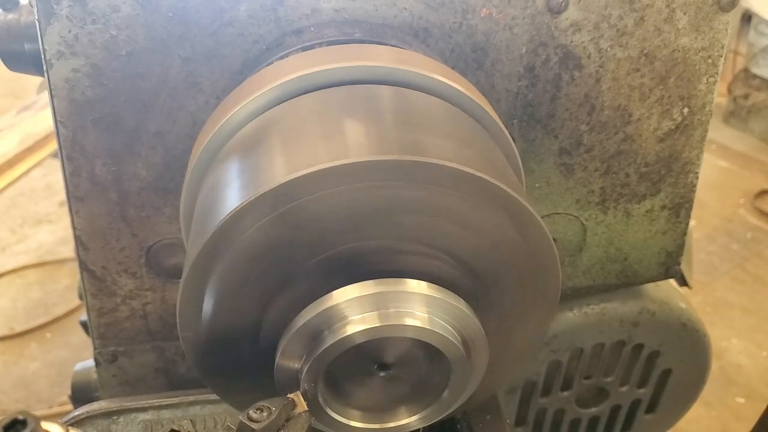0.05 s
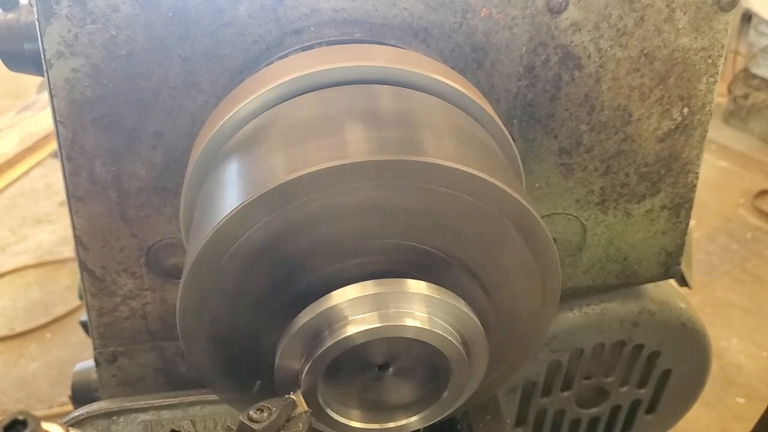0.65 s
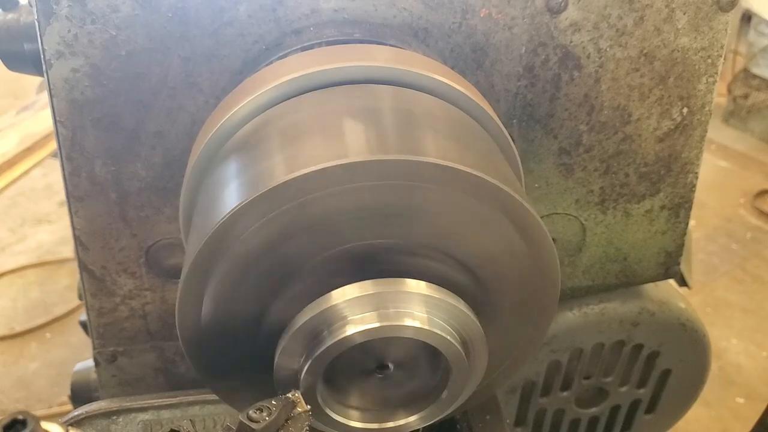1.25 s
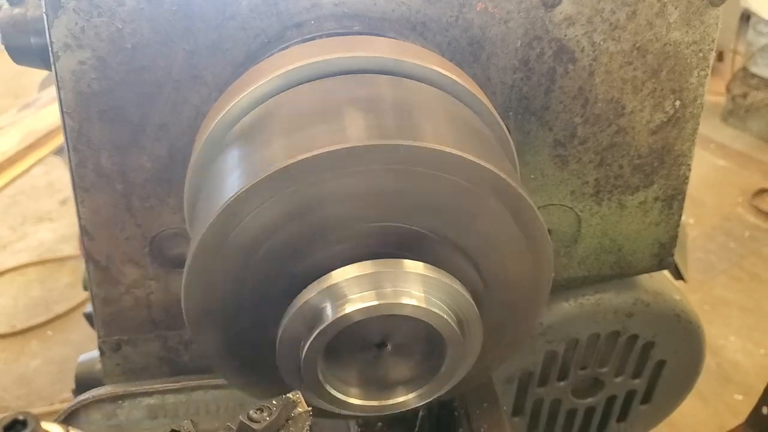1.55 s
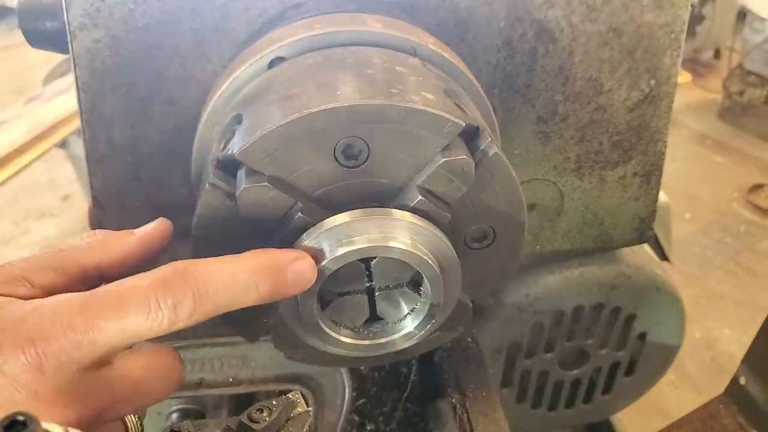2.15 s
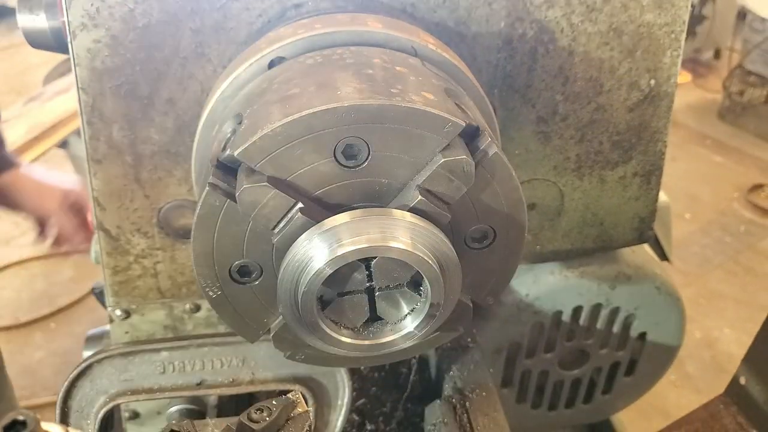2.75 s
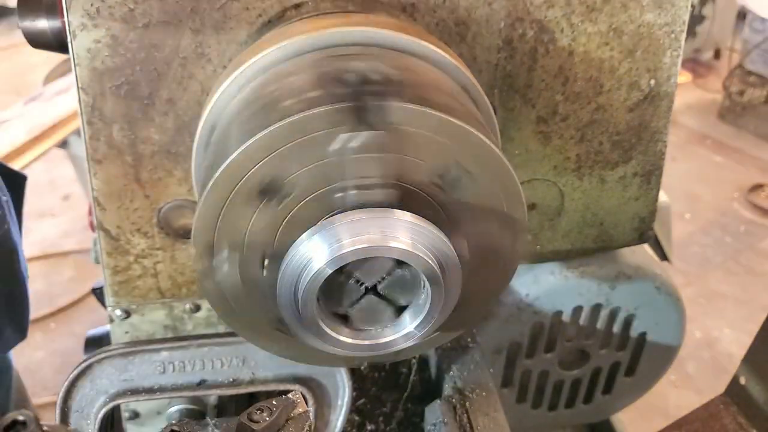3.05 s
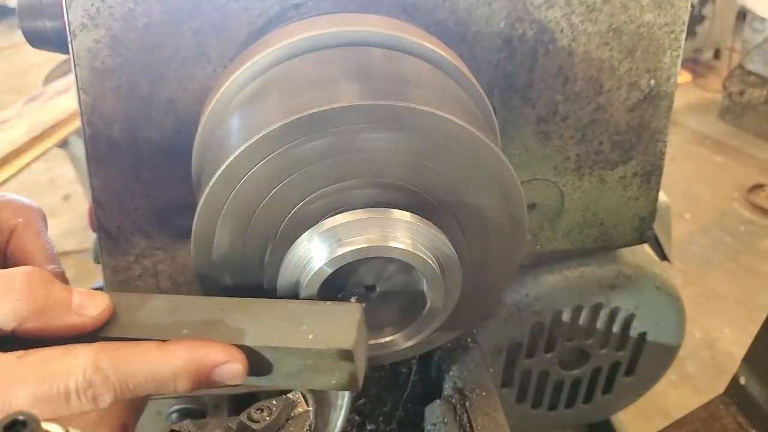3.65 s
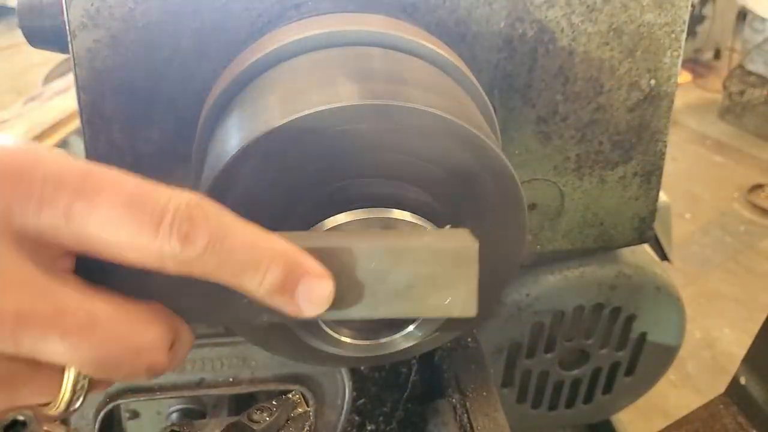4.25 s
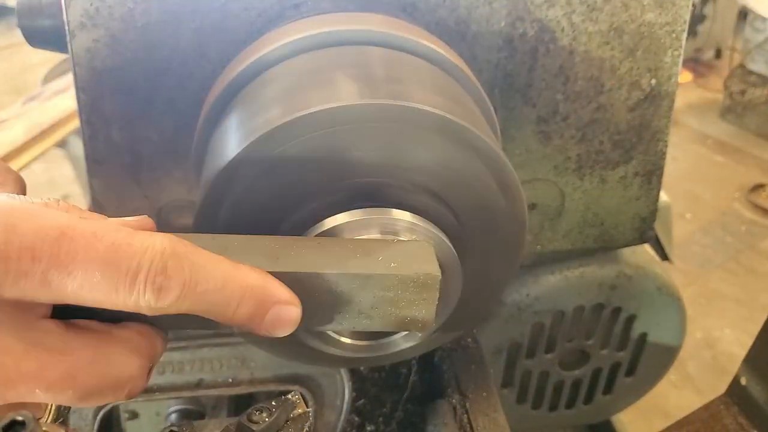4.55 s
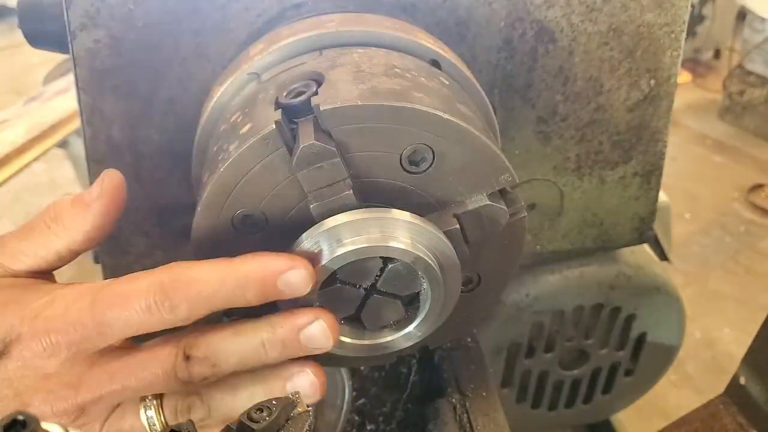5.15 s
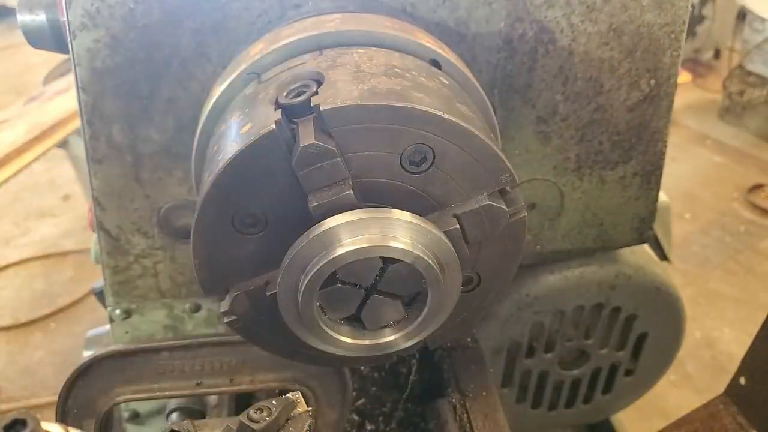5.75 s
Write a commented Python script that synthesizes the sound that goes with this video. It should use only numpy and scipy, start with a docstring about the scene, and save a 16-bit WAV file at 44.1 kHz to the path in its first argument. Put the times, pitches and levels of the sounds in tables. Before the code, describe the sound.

Close up in a workshop, a metal lathe runs with whining, rattling gears while a tool scrapes steel. It brakes with a few knocks, a thin high whistle lingers, and a finger squeaks on the part. The lathe spins up again with a rising whine and a hand-held file scrapes for about a second. It brakes once more, the whistle returns and a palm softly pats the part over a faint hum.

```python
"""A metal lathe in a workshop, heard close up on a stereo pair of microphones.
It is already running: gears whine and rattle in the cast headstock while a tool scrapes the steel part.
Near 1.9 s it brakes, teeth knocking; the motor whistles as it holds the chuck, and a finger squeaks on
the part. At 2.9 s it spins up again and a hand-held file scrapes. Near 5 s it brakes once more, the
whistle returns and a palm pats the part. A faint hum stays in the room throughout."""
import sys
import numpy as np
from scipy import signal
from scipy.io import wavfile
from scipy.ndimage import uniform_filter1d

SR = 44100
rng = np.random.default_rng(int(sys.argv[2]) if len(sys.argv) > 2 else 0)


def to_wav(sig):
    """Store sig (one row per channel, or 1-D mono) as 16-bit WAV at the path in sys.argv[1].

    Samples outside -1..1 are clipped; the rate is SR.
    """
    pcm = np.clip(np.atleast_2d(sig), -1, 1) * 32767
    pcm = np.round(pcm).astype(np.int16)
    wavfile.write(sys.argv[1], SR, pcm.T)  # frames by channels


N = 260189
TIME = np.arange(N) / SR
COARSE_TIME = np.arange(0, N + 64, 64) / SR
BINS = np.fft.rfftfreq(N, 1 / SR)

MESH_HZ, SHAFT_HZ = 86.64, 30.2  # at full speed
RUN_UP_S, BRAKE_S = 0.59, 0.225
TAKE_UP, DIE_AWAY = 0.072, 0.33  # shares of full speed: teeth take up their slack; braking sound fades
WHISTLE_HZ = 8015

# Table levels are relative, ahead of each source's gain; the drive's tones are given at full speed.
# runs of the spindle (switch on [s], brake [s], growl [dB], rattle [dB], hiss [dB])
RUNS = [(-1, 1.865, -48, -41, -46), (2.92, 4.972, -52, -42, -45.5)]
# drop of growl, rattle and hiss towards rest (pulling [dB], braking [dB], exponent)
SLOWING = [(4, 11.5, 1.17), (10, 19.5, 1.63), (14, 26.5, 1.45)]
# broad response of the headstock (frequency [Hz], level [dB])
HEADSTOCK = [(100, -26), (380, -21), (560, -8.5), (1000, -6.5), (1900, -3.5), (3000, 0), (3950, -5.5),
             (4300, -15), (4800, -12.5), (5400, -7.5), (9000, -13.5), (12000, -15.5), (13200, -28.5),
             (15500, -38.5)]
# resonances of its casting (frequency [Hz], width [Hz], lift [dB])
CASTING_MODES = [(1443, 91, 4.3), (1930, 78, 1.2), (2155, 22, 11), (2358, 160, 9), (3240, 480, 3.9),
                 (7825, 620, 5.9), (10510, 530, 7)]
# low tones of the loaded drive, one list a run (frequency [Hz], level [dB])
GROWL_TONES = [
    [(549.1, -58.5), (732.1, -77), (915.2, -64), (1211, -66), (1384, -77), (1717, -65), (1809, -58.5)],
    [(549.1, -64), (597.5, -67), (732.1, -71), (1098, -66), (1211, -65.5), (1389, -63.5), (1723, -72),
     (1814, -61.5)],
]
# motor overtones that swell in the first run (frequency [Hz], level [dB])
DRONE_TONES = [(274.6, -76), (823.6, -56), (1470, -61), (1561, -61.5), (1744, -54)]
# gear whine (frequency [Hz], level [dB])
GEAR_TONES = [(2164, -59.5), (2250, -54.5), (2342, -56.5), (2428, -50), (2514, -57), (2600, -56),
              (2686, -63.5), (2859, -57), (2977, -58.5), (3117, -56), (3295, -73), (3381, -58), (3467, -50),
              (3553, -60.5), (3639, -71), (3811, -63.5), (3898, -56.5), (4075, -83)]
# bearing whine (frequency [Hz], level [dB])
BEARING_TONES = [(5200, -71), (5959, -61), (6062, -62), (6325, -59), (6498, -66), (6848, -59),
                 (6934, -57.5), (7542, -63), (7607, -55), (7897, -66.5), (8145, -68.5), (10314, -65),
                 (10605, -75.5), (10745, -73)]
# sidebands of the drive's switching tone (frequency [Hz], level [dB])
SIDEBANDS = [(11250, -61.5), (12450, -67), (13650, -72), (14850, -63)]
# tool, then file (start [s], end [s], trend [dB/s], landing bite [dB], scrape [dB], shake [dB],
# growl [dB])
CUTS = [(-0.1, 1.28, 10.5, 2.5, -63, -69.5, -69), (3.46, 4.62, -10, 9, -56, -78, -48)]
# spectrum of tearing steel (frequency [Hz], level [dB])
GRIT = [(400, -25), (1200, 14.5), (3000, 2), (4500, -4.5), (6000, 6), (9000, 6.5), (10500, -13.5),
        (12500, 0.5), (14000, -26)]
# rumble spectrum of the machine bed (frequency [Hz], level [dB])
BED = [(20, -8), (45, -17.5), (80, -0.5), (160, -3.5), (300, -1.5), (500, -3.5), (900, -17.5)]
# hum tones in the room (frequency [Hz], level [dB])
HUM_TONES = [(458.5, -74), (920.5, -75.5), (1061, -95.5), (1378, -79), (4900, -99)]
# spectrum of the room's air (frequency [Hz], level [dB])
ROOM_AIR = [(24, -49), (60, -33), (250, -27.5), (350, -20.5), (440, -7), (560, -7), (950, -7.5),
            (1400, -13), (1700, -18), (3500, -24.5), (5500, -31), (8000, -30), (12500, -52.5), (15000, -77)]
# tooth tones under torque (frequency [Hz], level [dB])
TORQUE_TONES = [(2426, -53), (2860, -48), (3381, -50), (3466, -49), (3899, -53), (6931, -53)]
# teeth knocking across their backlash (time [s], level [dB])
KNOCKS = [(1.896, -34.5), (1.923, -43), (2.0205, -38), (2.035, -45.5), (2.068, -45), (2.9203, -55),
          (2.9383, -49), (2.9625, -45), (3.054, -46), (3.1, -43), (5.012, -45), (5.112, -44), (5.1171, -38),
          (5.1525, -45)]
# hiss spectrum of the holding motor (frequency [Hz], level [dB])
HOLD_HISS = [(900, -16), (2000, -7.5), (3800, -7.5), (4500, -12), (5400, -0.5), (6800, -10.5), (8000, -9),
             (8700, -6), (9300, -10), (12000, -16.5), (13500, -37)]
# dull bumps with a tick on top (time [s], thud [dB], tick [dB])
BUMPS = [(2.017, -82, -52), (2.775, -72, -64), (2.807, -83, -61), (2.838, -57.5, -68), (2.854, -71, -62),
         (3.075, -58, -37), (3.133, -53, -48), (3.144, -46.5, -35), (5.629, -77, -61), (5.728, -75, -69),
         (5.754, -69, -60)]
# spectrum of a thud (frequency [Hz], level [dB])
THUD = [(30, -32), (90, -22), (180, -5.5), (350, -1), (800, -26), (2000, -12), (8000, -23)]
# fingertip slips (start [s], length [s], first pitch [Hz], last pitch [Hz], level [dB])
SLIPS = [(2.316, 0.04, 1134, 875, -33.5), (2.3557, 0.024, 975, 935, -35.5)]
# partials of the squeak (multiple of the pitch, level [dB])
SQUEAK_PARTIALS = [(1, -1.5), (2, -19), (3, -17), (4, -23), (5, -23.5), (6, -28), (7, -30)]
# spectrum of skin rubbing steel (frequency [Hz], level [dB])
SKIN = [(180, -100), (300, -8), (620, 4), (940, 8), (1030, 10), (1240, 0.5), (2230, 9), (4680, -6.5),
        (8290, -12), (12000, -26), (15600, -56), (22000, -120)]
# stereo width at the microphones (frequency [Hz], side minus mid [dB])
WIDTH = [(60, 1), (200, 3), (380, -7.5), (700, -8), (1300, -9), (2400, -7.5), (4400, -7), (8000, -5),
         (13000, 4)]
# balance of the microphones (frequency [Hz], left minus right [dB])
LEAN = [(60, 2.5), (200, 3), (700, 1), (1300, -0.5), (2400, 0), (4400, 2), (8000, 2.5), (14000, 2)]


def amp(db):
    """Decibels to gain."""
    return 10 ** (np.asarray(db) / 20)


def unit(x):
    """Scales to rms 1."""
    return x / np.sqrt(np.mean(x ** 2) + 1e-20)


def spectrum(points):
    """A table of (frequency [Hz], level [dB]) on BINS, interpolated in log frequency."""
    hz, db = np.transpose(points)
    return np.interp(np.log(BINS + 1), np.log(hz + 1), db)


def colour(x, db):
    """Causal filter with the gain db, given on BINS."""
    size = 4096
    log_gain = np.log(amp(np.interp(abs(np.fft.fftfreq(size, 1 / SR)), BINS, db)))
    response = np.fft.ifft(np.exp(np.conj(signal.hilbert(log_gain)))).real
    return signal.oaconvolve(x, response[:size // 2])[:N]


def noise(points):
    """Noise of rms 1 with a given spectrum."""
    return unit(colour(rng.standard_normal(N), spectrum(points)))


def drift(per_s, t=TIME):
    """Random wander of rms 1."""
    knots = rng.standard_normal(8192)
    return unit(np.interp(t * per_s, np.arange(len(knots)), knots))


def grains(per_s, spread_db):
    """Random tiny impacts, a few of them large."""
    sizes = amp(spread_db * np.minimum(rng.exponential(1, N), 4)) * rng.choice([-1, 1], N)
    return unit(sizes * (rng.random(N) < per_s / SR))


def turning(hz):
    """Phase of something that turns at hz, from a random start."""
    return 2 * np.pi * (np.cumsum(hz * np.ones(N)) / SR + rng.random())


def ramp(start, length):
    """Rises from 0 to 1 in a straight line."""
    return np.clip((TIME - start) / length, 0, 1)


def envelope(start, end, rise_s, fade_db_per_s):
    """Attack, hold, release."""
    return ramp(start, rise_s) * amp(-fade_db_per_s * np.maximum(TIME - end, 0))


def burst(start, t60):
    """Envelope of a blow."""
    out = np.zeros(N)
    part = out[round(start * SR):][:SR // 4]
    part += amp(-60 * TIME[:len(part)] / t60)
    return out


def spindle(on, brake):
    """Share of full speed in one run: an even climb, a steady spell, a quick even stop."""
    return ramp(on, RUN_UP_S) * (1 - ramp(brake, BRAKE_S))


def drive_gains(speed, pull):
    """Growl, rattle and hiss follow the speed, and stay higher while the motor pulls."""
    meshed = sum(amp(levels_db)[:, None] * uniform_filter1d((spindle(on, brake) > TAKE_UP) * 1., 200)
                 for on, brake, *levels_db in RUNS)
    alive = np.clip(speed / DIE_AWAY + pull, 0, 1)
    slow = np.clip(1 - speed, 0, 1)
    slowing_db = [-(pull * pull_db + (1 - pull) * brake_db) * slow ** bend
                  for pull_db, brake_db, bend in SLOWING]
    return abs(meshed) * alive * amp(slowing_db)


def headstock():
    """Response of the casting in dB on BINS."""
    modes_db = sum(db / (1 + (2 * (BINS - hz) / width) ** 2) for hz, width, db in CASTING_MODES)
    return spectrum(HEADSTOCK) + modes_db


def whine(speed, tones, gain, tone_db, waver_db, speed_power):
    """Tones glide and grow with the speed, and swell as they cross the resonances of the casting."""
    body, out = headstock(), np.zeros(N)
    pace, travel = np.interp(COARSE_TIME, TIME, speed), np.cumsum(speed) / SR
    for hz, db in tones:
        harmonic = np.round(hz / MESH_HZ) * MESH_HZ
        hz = harmonic if abs(hz - harmonic) < 7 else hz
        lift_db = np.interp(hz * pace, BINS, body) - np.interp(hz, BINS, body)
        size = amp(db + np.minimum(lift_db, 5) + waver_db * drift(16, COARSE_TIME)) * pace ** speed_power
        # overtones of the mesh arrive nearly together, spread by the casting into one burst a cycle
        lag = .6 * ((hz - 2900) / 1000) ** 2 + .3 * rng.random()
        out += np.interp(TIME, COARSE_TIME, size) * np.sin(2 * np.pi * (hz * travel + lag))
    full_speed = (speed > .99) & (gain > 1e-4)
    return np.sqrt(2) * amp(tone_db) * out * gain / np.median(gain[full_speed])


def drive_tones(speed, runs, low, middle, high):
    """The loaded drive growls, the motor's drone swells through the first run, gears and bearings sing."""
    growl = sum(whine(speed, tones, low * (run > 0), tone_db=0, waver_db=1, speed_power=5.2)
                for tones, run in zip(GROWL_TONES, runs))
    swell = amp(12.5 * np.minimum(TIME - 1.07, 0))  # 12.5 dB/s, full at 1.07 s
    drone = swell * whine(speed, DRONE_TONES, runs[0], tone_db=-0.5, waver_db=-1, speed_power=3)
    gears = whine(speed, GEAR_TONES, middle, tone_db=2.5, waver_db=0.9, speed_power=0.99)
    bearings = whine(speed, BEARING_TONES, high, tone_db=-2.5, waver_db=3, speed_power=0.62)
    return growl + drone + gears + bearings


def rattle(speed, gains):
    """Teeth chatter in bursts, once a mesh cycle, swayed by the shaft; the casting rings."""
    mesh, shaft = 2 * np.pi * MESH_HZ * np.cumsum(speed) / SR, turning(SHAFT_HZ * speed)
    force = amp(2.8 * np.cos(mesh) + 1.1 * np.cos(mesh - shaft) + 0.66 * drift(90))
    impacts, body = grains(per_s=12000, spread_db=1.5), headstock()
    below = 1 / (1 + (BINS / 1950) ** 16)
    above = 1 - 1 / (1 + (BINS / 4300) ** 16)
    bands_db = [body + 10 * np.log10(abs(share) + 1e-7) for share in (below, 1 - below - above, above)]
    return sum(gain * amp(db) * unit(colour(impacts * force ** depth, band_db))
               for band_db, gain, db, depth in zip(bands_db, gains, (-1, -3, -2), (.5, 1.05, .75)))


def buzz(speed, gain):
    """The same tiny flaws strike again in every mesh cycle: a dense comb of overtones."""
    flaws = rng.standard_normal(512)
    cycle = turning(MESH_HZ * speed) / (2 * np.pi) % 1
    strikes = flaws[(cycle * len(flaws)).astype(int) % len(flaws)]
    thin_db = spectrum([(1500, -18.5), (4000, -40), (5200, 7.5), (9000, 4.5), (11000, 5.0)])
    return amp(-9) * gain * unit(colour(strikes, headstock() + thin_db))


def inverter(speed, gain, carrier_hz=13080):
    """Sidebands of the switching tone grow and fan out as the motor speeds up."""
    tones = sum(amp(db) * np.sin(turning(carrier_hz + (hz - carrier_hz) * speed)) for hz, db in SIDEBANDS)
    return tones * np.minimum(speed / .35, 1) * (gain / gain.max()) ** .25


def cutting_gains(bite_s=0.045):
    """Pressure of tool or file on the part drives three gains: scrape, bed shake and growl."""
    gains = np.zeros((3, N))
    for start, end, trend_db_per_s, bite_db, *levels_db in CUTS:
        age = np.clip(TIME - start, 0, end - start)
        touch = envelope(start, end, rise_s=0.035, fade_db_per_s=93)
        pressure = touch * amp(trend_db_per_s * age + bite_db * np.exp(-(age / bite_s) ** 2))
        gains += amp(levels_db)[:, None] * pressure
    return gains


def scrape(gain, turn_hz=11.6):
    """Steel tears off in fine grains, harder once each turn of the part."""
    pressure = amp(.6 * np.sin(turning(turn_hz)) + 0.65 * drift(23))
    return gain * pressure * unit(colour(grains(per_s=4100, spread_db=4.5), spectrum(GRIT)))


def bed_rumble(speed, cut_shake):
    """The bed rumbles with the speed, and more under the cut; each microphone gets its own noise."""
    idle = amp(-67 - 18.5 * (1 - speed)) * np.minimum(speed / TAKE_UP, 1)
    return np.hypot(idle, cut_shake) * amp(-0.9 * drift(8)) * np.array([noise(BED), noise(BED)])


def workshop():
    """Room tone: a wavering hum over the air."""
    hum = sum(amp(db + 1.8 * drift(7.6)) * np.sin(turning(hz + 1.15 * drift(11))) for hz, db in HUM_TONES)
    return np.sqrt(2) * hum + amp(-71.5) * noise(ROOM_AIR)


def loose_mode(hz=2230, half_width_hz=170):
    """Power response of the casting's loosest mode on BINS, 1 at its peak."""
    return 1 / (1 + ((BINS - hz) / half_width_hz) ** 2)


def loose_teeth(speed, gain):
    """While the speed changes the teeth run loose and keep one mode of the casting ringing."""
    slack = np.sqrt(np.clip(1 - speed, 0, 1))
    ringing = unit(colour(grains(per_s=560, spread_db=8.5), 20 * np.log10(loose_mode())))
    return amp(-3) * gain * slack * ringing


def strained_teeth(speed, torque, flutter_db=2.5, pitch_flutter=0.011):
    """Under torque a few rough tooth tones sing out as they glide through the casting's loudest range."""
    low_cut_db = 10 * np.log10(1 + (2000 / (BINS + 1)) ** 22)
    body, out = headstock() - low_cut_db + 6 * loose_mode(), np.zeros(N)
    for hz, db in TORQUE_TONES:
        size = amp(db + np.interp(hz * speed, BINS, body) + flutter_db * drift(200))
        out += size * np.sin(turning(hz * speed * (1 + pitch_flutter * drift(500))))
    return out * torque


def knocks(crack_t60=0.0016, clatter_t60=0.045):
    """Backlash: a sharp crack, then a short clatter in the casting."""
    blows = sum(amp(db) * (burst(s, clatter_t60) + amp(1) * burst(s, crack_t60)) for s, db in KNOCKS)
    return amp(3) * colour(blows * rng.standard_normal(N), headstock() + 6 * loose_mode())


def holding_motor(hold_s=0.503, lead_s=0.08, droop_hz_per_s=45000):
    """The motor whistles, hisses and trembles as it holds; on letting go the whistle droops, dying first."""
    out = np.zeros(N)
    hiss_and_tremble = amp(-1) * noise(HOLD_HISS) + amp(-21.5) * noise(BED)
    for _, brake, *_ in RUNS:
        rest = brake + BRAKE_S
        droop_hz = droop_hz_per_s * np.clip(TIME - rest - hold_s, 0, .1)
        grip = np.clip(1 - droop_hz / 700, 0, 1)
        whistle = amp(1) * grip * np.sin(turning(WHISTLE_HZ - droop_hz + 9 * drift(150)))
        held = envelope(rest - lead_s, rest + hold_s, rise_s=.012, fade_db_per_s=190)
        out += held * (whistle + hiss_and_tremble * amp(-4 * (1.5 - grip)))
    return amp(-65.5) * out


def bumps(thud_t60=0.037, tick_t60=0.004, bed_hz=85):
    """Each bump rocks the bed for a cycle or two and gives a wide, dry tick."""
    thuds = sum(amp(db) * burst(s, thud_t60) for s, db, _ in BUMPS)
    rocking = sum(amp(db - 10) * burst(s, thud_t60) * np.sin(2 * np.pi * bed_hz * (TIME - s))
                  for s, db, _ in BUMPS)
    ticks = sum(amp(db) * burst(s, tick_t60) for s, _, db in BUMPS)
    tick_spectrum = [(500, -16), (8000, -8), (12000, -19), (15000, -26)]
    return rocking + thuds * noise(THUD) + ticks * noise(tick_spectrum)


def finger_squeak(rise_s=0.003, fall_s=0.0061, sag_db=4):
    """Skin sticks and slips on smooth steel; in each slip the pitch sinks and the overtones grow."""
    out = np.zeros(N)
    for start, length, first_hz, last_hz, slip_db in SLIPS:
        progress = ramp(start, length)
        hz = last_hz + (first_hz - last_hz) * (1 - progress) ** 1.1
        phase = turning(hz * (1 + 0.0145 * drift(700)))
        brightness = amp(2 + 0.123 * (991 - hz))
        wave = sum(amp(db) * np.sin(k * phase + k * k) * (brightness if k > 1 else 1)
                   for k, db in SQUEAK_PARTIALS)
        touch = ramp(start, rise_s) * (1 - ramp(start + length - fall_s, fall_s))
        out += amp(slip_db - sag_db * progress) * touch * (wave + 0.091 * noise(SKIN))
    return out


def starting_motor(from_hz=7520, delay_s=0.037, glide_s=0.13):
    """As the second run starts, the motor's whistle climbs to its usual pitch and fades."""
    on = RUNS[-1][0]
    hz = from_hz + (WHISTLE_HZ - from_hz) * ramp(on + delay_s, glide_s)
    swell = envelope(on + delay_s / 2, on + delay_s + glide_s, rise_s=0.048, fade_db_per_s=130)
    return amp(-60) * swell * np.sin(turning(hz + 7 * drift(150)))


def palm(at_s=5.217, rise_s=0.0053):
    """A palm pats the part and slides off."""
    return amp(-50.5) * envelope(at_s, at_s + rise_s, rise_s, fade_db_per_s=159) * noise(SKIN)


def reflections(x, side_db, t60, sweep_rad):
    """Reflections reach the two microphones unlike, and shift as chuck and hands move."""
    t = TIME[:SR // 8]
    tails = rng.standard_normal((2, len(t))) * amp(-60 * t / t60)
    first, second = (signal.oaconvolve(x, tail / np.linalg.norm(tail))[:N] for tail in tails)
    angle = sweep_rad * drift(40)
    side = colour(first * np.cos(angle) + second * np.sin(angle), spectrum(WIDTH) + side_db)
    return np.array([x + side, x - side])


def scene():
    """The drive and the work on the part close by, with the room around them."""
    runs = [spindle(on, brake) for on, brake, *_ in RUNS]
    speed = sum(runs) * (1 + .0002 * drift(14))
    torque = uniform_filter1d(np.gradient(sum(runs)) * SR, size=1500)
    pull, braking = np.clip(torque * RUN_UP_S, 0, 1), np.clip(-torque * BRAKE_S, 0, 1)
    cut_scrape, cut_shake, cut_growl = cutting_gains()
    low, middle, high = drive_gains(speed, pull)
    low = np.hypot(low, cut_growl)
    contact = amp(-4 * braking)  # braking lifts the teeth off their driving flanks
    tones = contact * drive_tones(speed, runs, low, middle, high)
    tones += strained_teeth(speed, pull + amp(-13) * braking) + holding_motor() + starting_motor()
    clatter = rattle(speed, (low, middle, high)) + loose_teeth(speed, middle) + buzz(speed, high)
    clatter += knocks() + bumps()
    work = scrape(cut_scrape) + finger_squeak() + palm()
    return (reflections(clatter + work, side_db=0.5, t60=0.078, sweep_rad=2.33)
            + reflections(tones, side_db=-2, t60=0.099, sweep_rad=0.18)
            + reflections(workshop(), side_db=-4, t60=0.098, sweep_rad=.8)
            + bed_rumble(speed, cut_shake) + inverter(speed, middle))


def record(dry, edge_hz=15700):
    """The left microphone hears a little more; both channels are cut off above edge_hz."""
    lean_db = spectrum(LEAN) / 2
    heard = np.array([colour(dry[0], lean_db), colour(dry[1], -lean_db)])
    low_pass = signal.firwin(511, edge_hz, window=("kaiser", 9), fs=SR)
    return signal.oaconvolve(heard, low_pass[None], "same")


dry = scene()
out = record(dry)
to_wav(out)
```